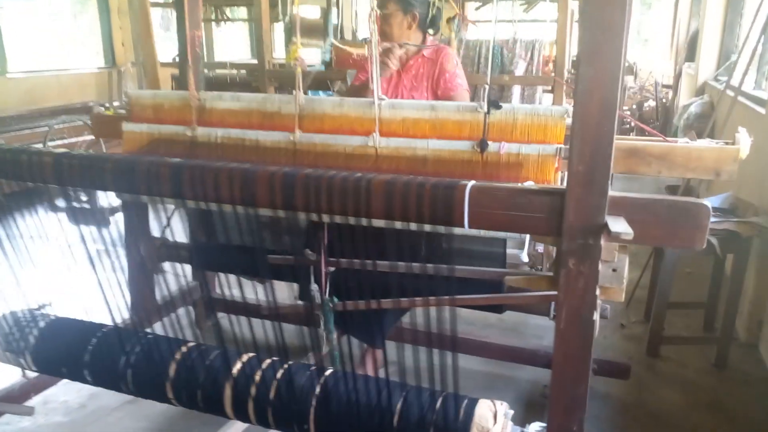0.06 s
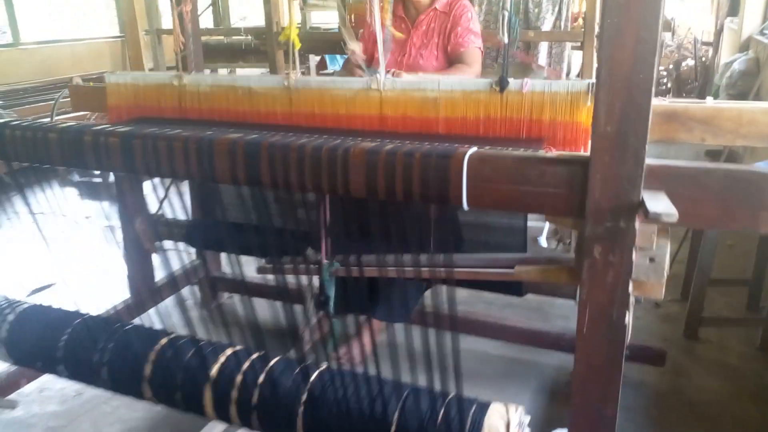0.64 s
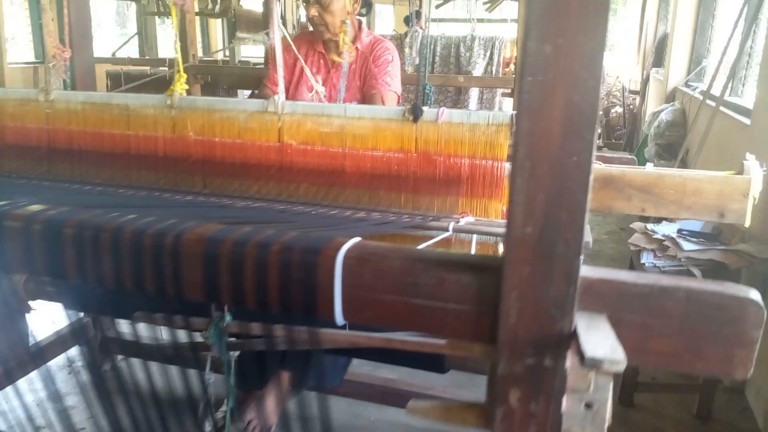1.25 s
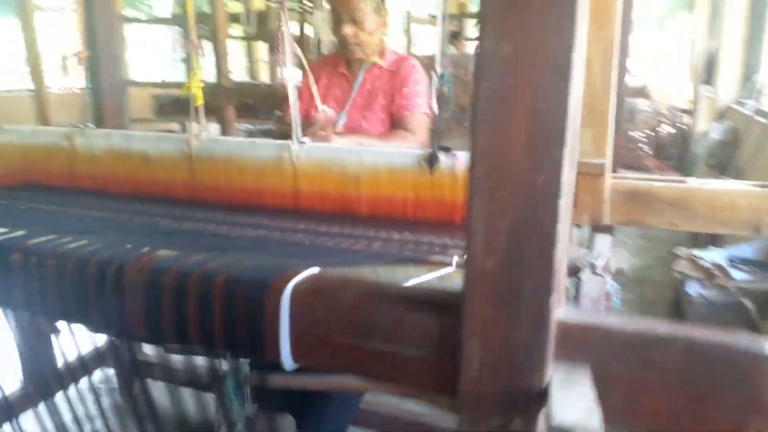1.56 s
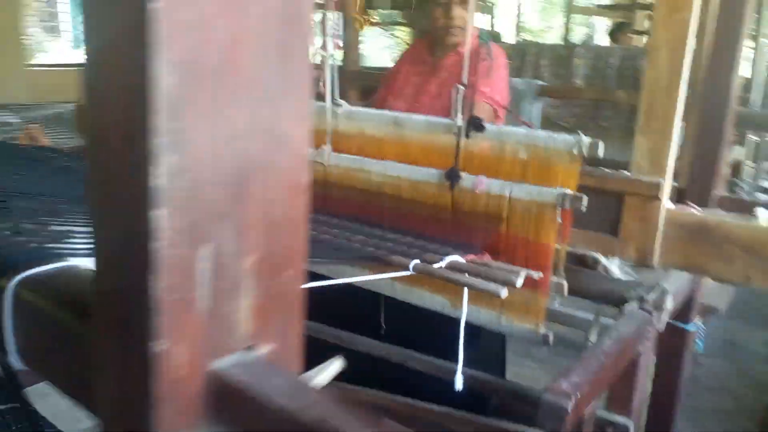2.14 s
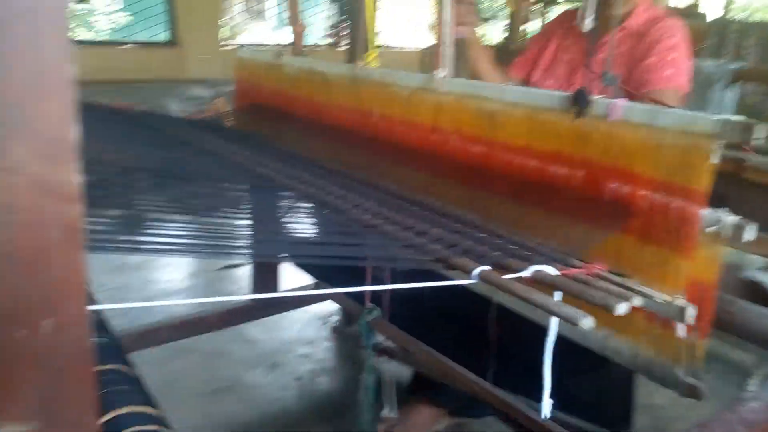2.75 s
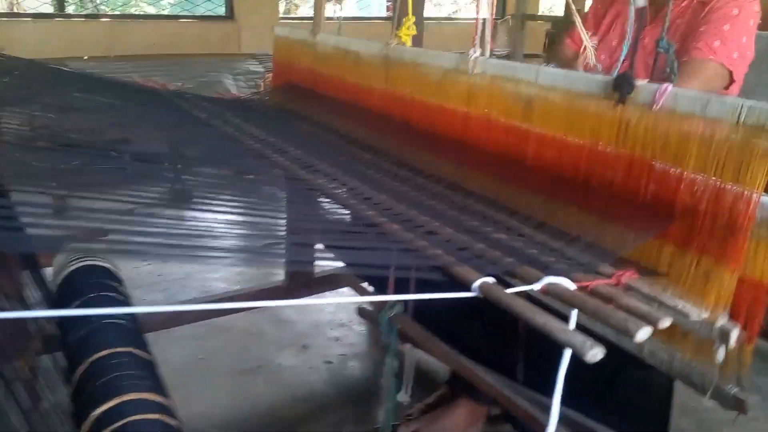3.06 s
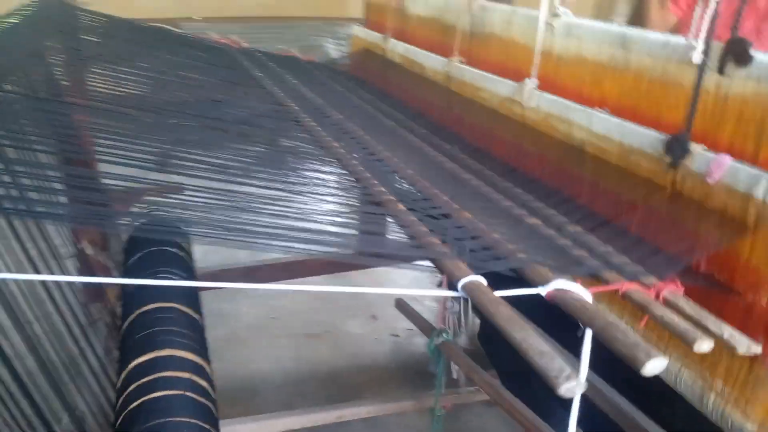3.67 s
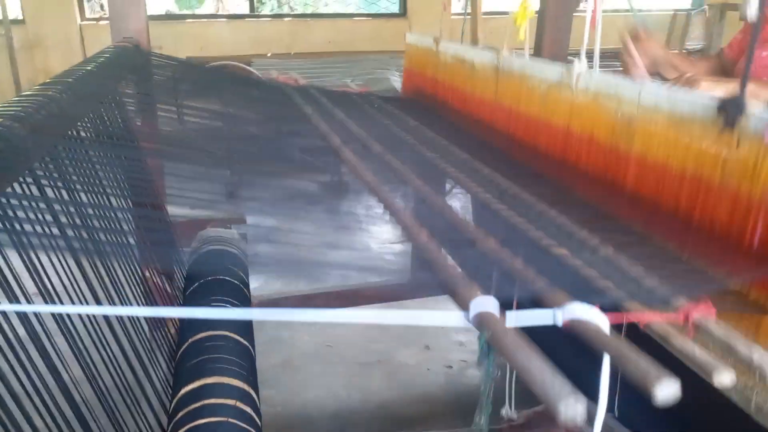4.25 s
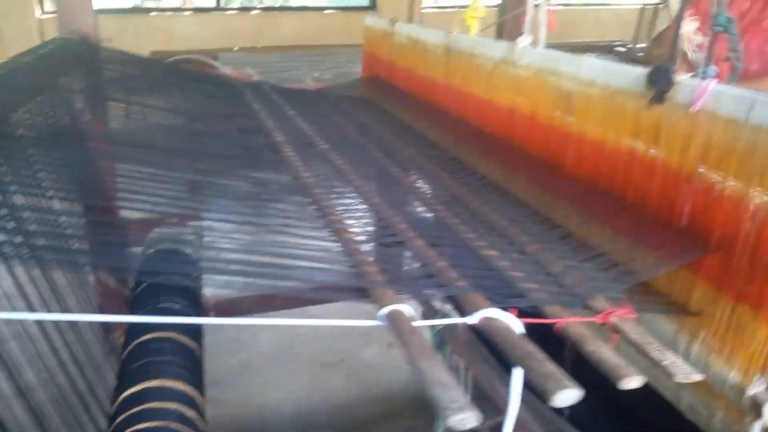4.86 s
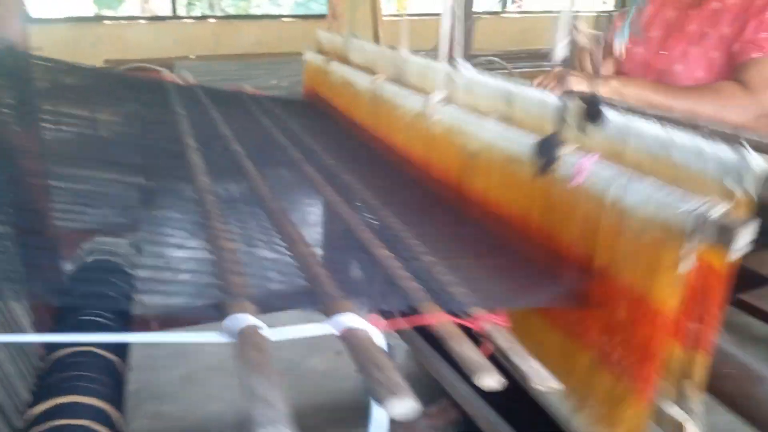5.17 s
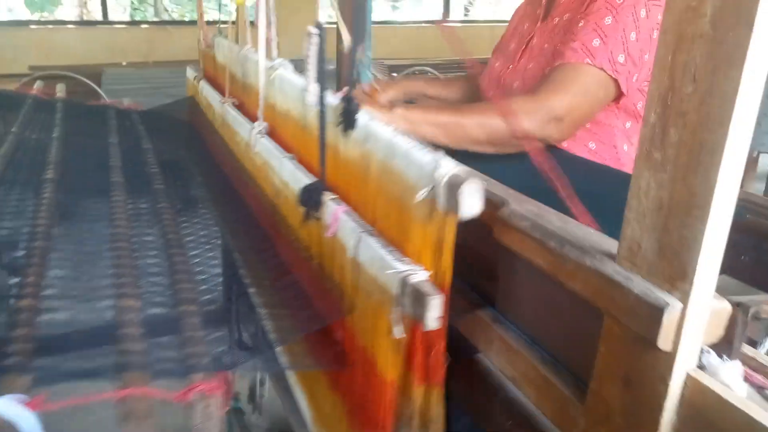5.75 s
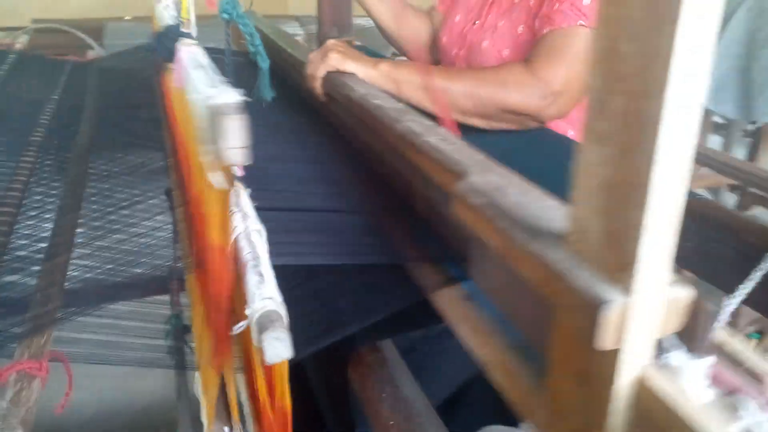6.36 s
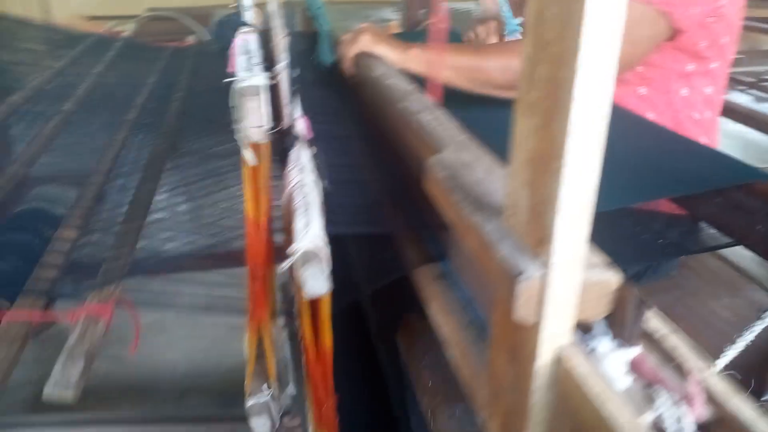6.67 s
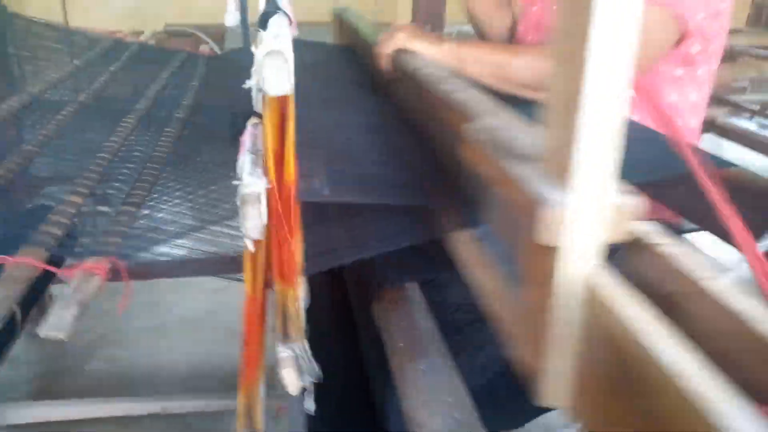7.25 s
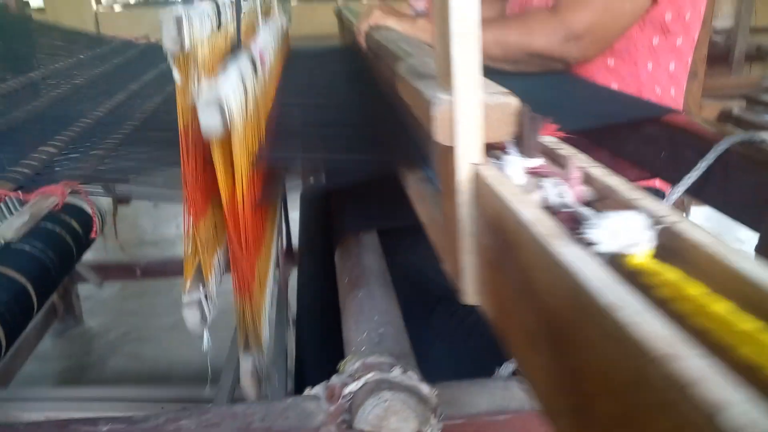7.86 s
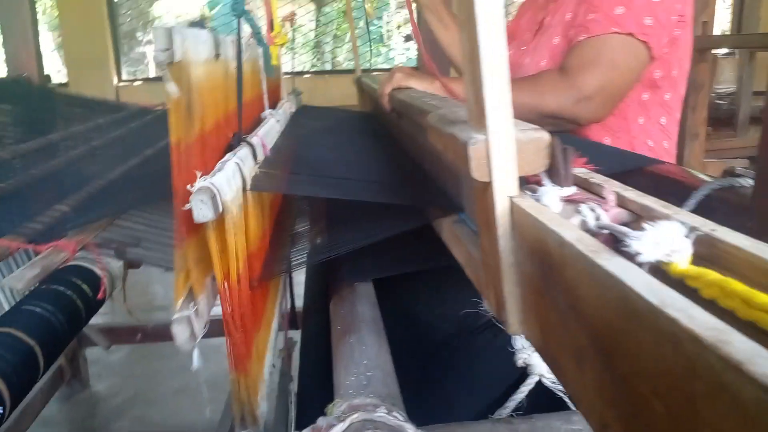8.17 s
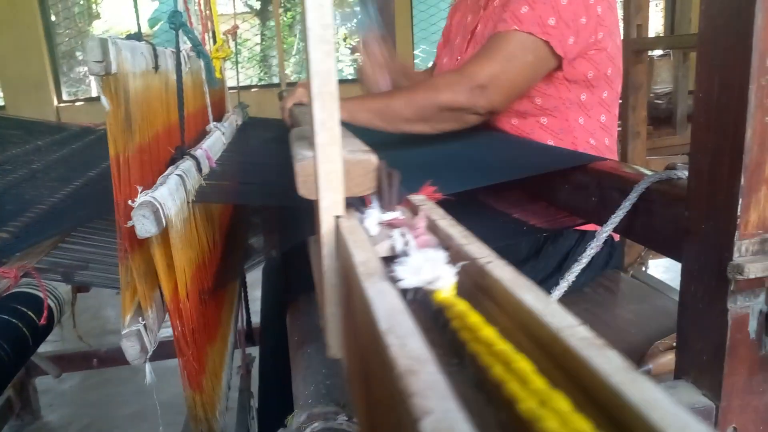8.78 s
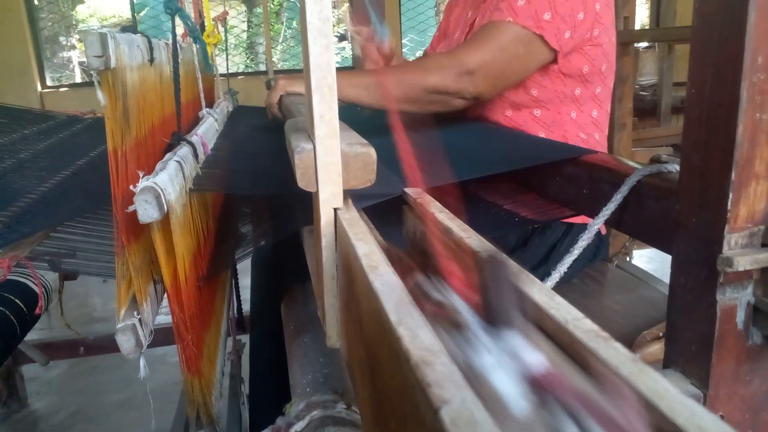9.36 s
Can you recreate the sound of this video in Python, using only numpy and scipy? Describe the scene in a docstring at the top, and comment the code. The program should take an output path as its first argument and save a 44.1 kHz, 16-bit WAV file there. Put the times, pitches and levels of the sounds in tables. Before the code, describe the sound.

A wooden handloom clacks in a quick, steady rhythm in a quiet workshop, growing closer, pausing briefly, then clacking once more.

```python
"""A wooden fly-shuttle handloom works in a quiet open workshop; each impact excites damped modes of wood.
First a treadle knocks and the warp threads rub as the shed opens. The picker strikes the shuttle, which
rattles along the race, lands in the opposite box and bounces; then the beater knocks as the warp swishes.
The cycle repeats from alternate ends, with a few thuds and squeaks, while the listener nears one box and
direct sound gains on reverberation. After a short pause comes a last throw as the listener draws back."""
import sys
import numpy as np
from scipy import signal
from scipy.fft import rfft, irfft, next_fast_len
from scipy.io import wavfile
from scipy.ndimage import uniform_filter1d

SR = 44100
rng = np.random.default_rng(int(sys.argv[2]) if len(sys.argv) > 2 else 0)


def generate_wav(sig):
    """Save sig (samples, or channels by samples) to the path in sys.argv[1] as 16-bit PCM at SR."""
    pcm = np.round(np.clip(np.atleast_2d(sig).T, -1, 1) * 32767).astype(np.int16)
    wavfile.write(sys.argv[1], SR, pcm)


N = 419832
TIME = np.arange(N) / SR
AGE = np.arange(24000) / SR   # seconds since the start of one impact
ROOM_T60_S, TREBLE_T60_S, EARLY_T60_S = 0.55, 0.51, 0.27
TREBLE_HZ = 2900   # modes below form the body tone, modes above the crack
NEAR_TOUCH_S, FAR_TOUCH_S = .013, .008   # contact time of the shuttle with picker or box
SPOT_WIDTH, SPOT_DB = .11, 0   # mode of the struck spot; bandwidth as a share of its pitch


def from_db(db):
    """Amplitude ratio of a level in decibels."""
    return np.exp(np.asarray(db) * np.log(10) / 20)


def unit_rms(x):
    """Normalises the power of a steady sound to rms 1."""
    return x / np.sqrt(np.mean(x ** 2) + 1e-20)


def unit_energy(x):
    """Normalises the energy of a transient to that of 10 ms at rms 1."""
    return x / np.sqrt(np.sum(x ** 2) / (.01 * SR) + 1e-20)


def add(track, start_s, sound):
    """Superposition: sums a sound into a track."""
    start = max(round(start_s * SR), 0)
    track[start:start + len(sound)] += sound[:max(N - start, 0)]


def resonate(x, hz, width_hz):
    """A damped resonator with unit gain at its peak."""
    r = np.exp(-np.pi * width_hz / SR)
    feedback = [1, -2 * r * np.cos(2 * np.pi * hz / SR), r * r]
    return signal.lfilter(np.array([1, 0, -1]) * (1 - r * r) / 2, feedback, x + 1e-18)


def pass_filter(x, hz, kind):
    """A second-order low- or high-pass."""
    return signal.lfilter(*signal.butter(2, hz, kind, fs=SR), x + 1e-18)


def coloured_noise(spectrum):
    """Spectral shaping: white noise takes on levels interpolated over log frequency; rms 1."""
    size = next_fast_len(N)
    hz = np.maximum(np.arange(size // 2 + 1) * SR / size, 1)
    points_hz, points_db = np.transpose(spectrum)
    level_db = np.interp(np.log(hz), np.log(points_hz), points_db)
    return unit_rms(irfft(rfft(rng.standard_normal(size)) * from_db(level_db), size)[:N])


def contacts(length_s, count, grit_db=-18, grit_s=0.0031):
    """Contact force of wood on wood: a few quick impulses, each trailing a little grit."""
    t = AGE[:SR // 20]
    force = np.zeros(len(t))
    jitter = rng.random(count) * (np.arange(count) > 0)
    touch_s = (np.arange(count) + jitter) / count * length_s
    force[(touch_s * SR).astype(int)] = rng.choice([-1, 1], count) * from_db(rng.normal(0, 2.9, count))
    grit = from_db(grit_db) * rng.standard_normal(len(t)) * np.exp(-t / grit_s)
    return np.pad(force + signal.fftconvolve(force, grit)[:len(t)], (0, len(AGE) - len(t)))


def wood(force, modes, crack_db, detune=0.02, scatter_db=2.5, early_db=-1, delay_s=.005):
    """Modal synthesis: modes, varied at each blow, sum to a direct sound and a diffuse echo."""
    drive = np.array([force, rng.standard_normal(len(AGE))])   # rows: direct sound, echo
    body, crack = 0, 0
    for k, (hz, width_hz, level_db) in enumerate(modes):
        ring = resonate(drive, hz * (1 + detune * rng.normal()), width_hz)
        ring *= from_db(level_db + scatter_db * rng.normal()) * (-1) ** k
        if hz < TREBLE_HZ:
            body += ring
        else:
            crack += ring
    body, crack = pass_filter(body, 3000, "low"), pass_filter(crack, 2000, "high")
    direct = unit_energy(body[0]) + from_db(crack_db) * unit_energy(crack[0])
    # early reflections from looms and floor die fast; the room's tail remains, shorter in the treble
    early = from_db(early_db - 60 * AGE / EARLY_T60_S)
    arrived = np.clip(AGE / delay_s - .5, 0, 1)
    body_echo = unit_energy(body[1] * arrived * np.hypot(early, from_db(-60 * AGE / ROOM_T60_S)))
    crack_echo = unit_energy(crack[1] * arrived * np.hypot(early, from_db(-60 * AGE / TREBLE_T60_S)))
    return direct, body_echo + from_db(crack_db) * crack_echo


# the listener's distance from the near shuttle box: time_s, distance_m
LISTENER_PATH = [(0, 1.15), (2.0, 1.15), (3.4, .7), (5.2, .52), (6.9, .28), (7.5, .29), (9.3, .5)]

def impact(force, modes, start_s, across, level_db, crack_db, detune):
    """Distance thins and blunts a blow and raises its share of echo; across is 0 near, 1 at the far box."""
    loom_width_m, critical_m = 1.6, 1.25   # at the critical distance, direct sound equals echo
    low_hz, loss_db_per_doubling, rise_s_per_m = 700, 0.8, .0015
    distance_m = np.hypot(np.interp(start_s, *np.transpose(LISTENER_PATH)), across * loom_width_m)
    low_loss_db = loss_db_per_doubling * np.log2(distance_m / .5)
    modes = [(hz, width_hz, db - (hz < low_hz) * low_loss_db) for hz, width_hz, db in modes]
    onset = np.minimum(.5 + .5 * AGE / (rise_s_per_m * distance_m), 1)
    direct, echo = wood(force * onset, modes, crack_db, detune)
    wet = distance_m / critical_m
    return from_db(level_db) * (direct + wet * echo) / np.hypot(1, wet)


# spectrum of the quiet workshop: frequency_hz, relative_density_db
WORKSHOP_SPECTRUM = [(30, -9), (90, 3.5), (450, -10.5), (1400, 1), (1900, -6), (3000, -25), (4000, -11),
                     (8000, -32), (16000, -22)]

def workshop(level_db=-73):
    """Stationary noise forms the background of the room."""
    return from_db(level_db) * coloured_noise(WORKSHOP_SPECTRUM)


# modes of the loom frame: pitch_hz, bandwidth_hz, level_db
FRAME_MODES = [(110, 140, -29), (318, 150, -10.5), (570, 84, -2), (775, 150, -2), (1030, 96, -3.5),
               (1592, 240, -3.5), (2230, 320, -7), (2900, 420, 3), (4500, 980, 0), (6000, 1700, -5),
               (11000, 8000, -18.5)]

def frame_knock(start_s, across, level_db, hz, crack_db, width_hz=190, part_db=1.5, touch_s=.003):
    """Impulse response: a struck part adds its own mode to those of the frame."""
    modes = list(FRAME_MODES) + [(hz, width_hz, part_db)]
    return impact(contacts(touch_s, count=2), modes, start_s, across, level_db, crack_db, detune=0.045)


# stray knocks of loose parts, and one light beater stroke at 8.164 s: start_s, level_db, pitch_hz
STRAY_KNOCKS = [(0.002, -26, 1450), (0.041, -24.5, 2770), (3.282, -19, 1030), (5.057, -19, 1030),
                (5.228, -21.5, 1030), (5.551, -18, 720), (5.679, -14.5, 2200), (6.208, -22.5, 1580),
                (6.301, -29, 1030), (6.828, -20, 960), (7.331, -30, 760), (7.677, -30, 1100),
                (8.164, -31, 960), (9.236, -25, 1060)]

def loose_parts(taut_before_s=.039, taut_db=-20, taut_hz=1130,
                slack_after_s=.074, slack_db=-23, slack_hz=2650, crack_db=-13, stray_across=.3):
    """Free play causes impacts: parts knock; the near picker taps on tightening and on dropping back."""
    taps = [(s - taut_before_s, 0, taut_db, taut_hz) for s, *_ in PICKER_STRIKES[::2]]
    taps += [(s + slack_after_s, 0, slack_db, slack_hz)
             for s, *_ in BEATER_STROKES if not last_landing(s)[0]]
    taps += [(s, stray_across, level_db, hz) for s, level_db, hz in STRAY_KNOCKS]
    out = np.zeros(N)
    for s, across, level_db, hz in taps:
        add(out, s, frame_knock(s, across, level_db, hz, crack_db))
    return out


def floor_rumble(loom, gain_db=-25, top_hz=110, t60_s=.8):
    """Energy storage: frame and floor take up the loom's vibration and release it as a low rumble."""
    retained = from_db(-120 / (t60_s * SR))
    shaking = np.sqrt(signal.lfilter([1], [1, -retained], loom ** 2 + 1e-18) / SR)
    low_noise = pass_filter(rng.standard_normal(N), top_hz, "low")
    return shaking * from_db(gain_db) * unit_rms(pass_filter(low_noise, top_hz / 2, "high"))


# a treadle opens the shed: start_s, level_db, pitch_hz
TREADLE_PRESSES = [(0.232, -24, 560), (1.118, -18, 830), (1.995, -22.5, 740), (2.898, -19, 1230),
                   (3.779, -19.5, 2500), (4.674, -20, 660), (5.536, -21.5, 800), (6.452, -21, 980),
                   (7.343, -14, 760)]

def treadles(near_across=.35, far_across=1.15, near_crack_db=-10, far_crack_db=-13):
    """Impact excitation: two treadles strike the frame in turn, the far one sounding duller."""
    out = np.zeros(N)
    for k, (s, level_db, hz) in enumerate(TREADLE_PRESSES):
        across, crack_db = (far_across, far_crack_db) if k % 2 else (near_across, near_crack_db)
        add(out, s, frame_knock(s, across, level_db, hz, crack_db))
    return out


def stroke(middle_s, length_s):
    """A half-sine envelope: sliding motion swells and stops."""
    out = np.zeros(N)
    add(out, middle_s - length_s / 2, np.sin(np.linspace(0, np.pi, round(length_s * SR))))
    return out


def reverberant_envelope(level):
    """Reverberation: half of the energy arrives at once, half decays exponentially in the room."""
    retained = from_db(-120 / (ROOM_T60_S * SR))
    lingering = signal.lfilter([1 - retained], [1, -retained], level ** 2 + 1e-18)
    return np.sqrt(.5 * level ** 2 + .5 * lingering)


# spectrum of dry threads rubbing: frequency_hz, relative_density_db
THREAD_SPECTRUM = [(40, -16), (110, -13), (200, -21.5), (330, -2.5), (450, -15), (600, -3), (1020, 0.5),
                   (1300, 1.5), (2300, -5.5), (3100, -14.5), (5800, -22), (8500, -30.5), (15000, -30)]
# the warp shifts between strokes: middle_s, length_s, relative_level_db
WARP_SHIFTS = [(6.76, .13, -33), (8.09, 0.15, -37.5), (8.68, 0.15, -47), (8.79, 0.18, -35)]

def warp(pull_before_s=0.04, pull_s=0.2, pull_db=-36.5, flight_after_s=.22, flight_s=.2, flight_db=-39,
         beat_s=.25, grain_db=2.8, grain_s=.004, tick_db=-20):
    """Stick-slip friction: threads rub as the shed opens, the shuttle passes and the beater swings."""
    rubs = list(WARP_SHIFTS) + [(s, beat_s, swish_db) for s, _, _, swish_db in BEATER_STROKES]
    rubs += [(s - pull_before_s, pull_s, pull_db) for s, *_ in PICKER_STRIKES[1::2]]
    rubs += [(s - pull_before_s / 2, pull_s / 2, pull_db) for s, *_ in PICKER_STRIKES[::2]]
    rubs += [(s + flight_after_s, flight_s, flight_db) for s, *_ in PICKER_STRIKES]
    speed = sum(from_db(level_db) * stroke(s, length_s) for s, length_s, level_db in rubs)
    grains = unit_rms(uniform_filter1d(rng.standard_normal(N), round(grain_s * SR)))
    friction = unit_rms(coloured_noise(THREAD_SPECTRUM) * from_db(grain_db * grains))
    return reverberant_envelope(speed) * friction + from_db(tick_db) * heddle_ticks(speed)


def heddle_ticks(speed, per_s=70, spread_db=5, width_hz=1300, low_hz=5500, high_hz=14000, count=8):
    """Shot noise: single threads snap past the heddles at random, each with a small bright ring."""
    out, tries = 0, 400
    chance = per_s * N / SR / count / tries
    for hz in np.geomspace(low_hz, high_hz, count):
        ticks = np.zeros(N)
        at = rng.integers(0, N, tries)
        ticks[at] = (rng.random(tries) < chance) * from_db(spread_db * rng.standard_normal(tries))
        out += resonate(ticks, hz, width_hz)
    return speed * unit_rms(out)


# modes of picker and shuttle: pitch_hz, bandwidth_hz, level_db
PICKER_MODES = [(80, 44, -26), (320, 85, -14.5), (614, 130, -8.5), (960, 118, 0), (1098, 116, -0.5),
                (1579, 220, -2), (1865, 200, -4.5), (2350, 238, -2.5), (3530, 700, -1.5), (4660, 1100, 1),
                (6080, 1300, -2), (12000, 8000, -12)]
# throws, near and far in turn: start_s, level_db, spot_pitch_hz, relative_rattle_db
PICKER_STRIKES = [(0.318, -8.5, 1550, -25), (1.202, -7.5, 1600, -24), (2.084, -8.5, 1700, -25.5),
                  (2.981, -8, 1550, -24), (3.862, -8.5, 950, -23), (4.752, -8, 2250, -24),
                  (5.635, -7, 1700, -23), (6.534, -6.5, 990, -28.5), (7.431, -9, 600, -32),
                  (8.897, -8.5, 1400, -27.5)]

def throws(near_crack_db=-12.5, far_crack_db=-13, race_after_s=.034, race_db=-2.5):
    """Momentum transfer: the picker strikes the shuttle along the race, crisper from the near end."""
    out = np.zeros(N)
    cord_snap = (3150, 700, -2)   # pitch_hz, bandwidth_hz, level_db
    for k, (s, level_db, hz, rattle_db) in enumerate(PICKER_STRIKES):
        far = k % 2
        touch_s, crack_db = (FAR_TOUCH_S, far_crack_db) if far else (NEAR_TOUCH_S, near_crack_db)
        modes = list(PICKER_MODES) + [(hz, SPOT_WIDTH * hz, SPOT_DB), cord_snap]
        add(out, s, impact(contacts(touch_s, count=5), modes, s, far, level_db, crack_db, detune=0.015))
        if far:
            rattle = race(crack_db=-7, room_db=-4, weft_db=-14)
        else:
            rattle = race(crack_db=-5.5, room_db=-6, weft_db=-13)
        add(out, s + race_after_s, from_db(rattle_db + race_db) * rattle)
    return out


def race(crack_db, room_db, weft_db, run_s=0.08, ticks_per_s=220, spread_db=4.5, scrape_db=-28, weft_s=.24):
    """Roughness excitation: the shuttle skips over the reed wires; the weft ticks off the bobbin."""
    size = len(AGE)
    ticks = (rng.random(size) < ticks_per_s / SR) * rng.choice([-1, 1], size)
    ticks = ticks * from_db(spread_db * rng.standard_normal(size))
    scrape = from_db(scrape_db) * rng.standard_normal(size)
    direct, echo = wood((ticks + scrape) * (AGE < run_s), PICKER_MODES, crack_db)
    # the echo builds up for as long as the shuttle runs
    swell = np.minimum(AGE / run_s, 1) * from_db(60 * np.minimum(AGE, run_s) / ROOM_T60_S)
    weft_ticks = pass_filter(ticks * (AGE < weft_s), TREBLE_HZ, "high")
    weft = from_db(crack_db + weft_db) * unit_energy(weft_ticks)
    return (direct + weft + from_db(room_db) * unit_energy(echo * swell)) * np.sqrt(run_s / .01)


# modes of a shuttle box: pitch_hz, bandwidth_hz, level_db
BOX_MODES = [(90, 93, -33), (310, 100, -17), (591, 66, -3), (770, 130, -3.5), (1030, 182, 2),
             (1530, 200, -1.5), (1745, 150, -1), (2560, 640, -8.5), (3670, 1000, -2.5), (4750, 930, 0.5),
             (6400, 1300, -3), (12500, 5900, -12.5)]

def box_hit(start_s, level_db, force, detune):
    """Free vibration: the box rings where the shuttle hits it; the near box also clinks."""
    far, hz, crack_db = last_landing(start_s)
    clink = (3590, 400, -3)   # pitch_hz, bandwidth_hz, level_db
    modes = list(BOX_MODES) + [(hz, SPOT_WIDTH * hz, SPOT_DB)] + ([] if far else [clink])
    return impact(force, modes, start_s, far, level_db, crack_db, detune)


# the shuttle lands, far and near in turn: start_s, level_db, spot_pitch_hz, relative_crack_db
SHUTTLE_LANDINGS = [(0.636, -7, 1550, -9.5), (1.523, -10.5, 1500, -8.5), (2.396, -7, 1550, -7.5),
                    (3.295, -6.5, 800, -10.5), (4.171, -9, 1620, -8.5), (5.069, -9.5, 590, -10),
                    (5.949, -12, 1700, -8.5), (6.85, -6.5, 950, -12), (7.746, -13.5, 780, -11),
                    (9.277, -10, 1480, -13)]
# its hardest bounces in the box: start_s, level_db
SHUTTLE_BOUNCES = [(0.694, -13), (1.588, -15), (3.334, -12.5), (3.357, -13.5), (4.231, -14), (5.081, -11.5),
                   (5.108, -11), (5.15, -15), (6.0, -16), (6.889, -13.5), (6.911, -9.5), (6.921, -14),
                   (6.938, -11), (6.963, -18.5), (7.005, -16), (7.799, -18), (9.291, -10.5), (9.337, -13.5)]

def landings(bounce_s=.004, gap_s=.03, jitter=.15, chatter_db=-11, loss_db=1.2, chatter_count=5):
    """Inelastic collision: the shuttle lands and rebounds; in the near box it chatters ever more softly."""
    out, bounces = np.zeros(N), list(SHUTTLE_BOUNCES)
    for s, level_db, *_ in SHUTTLE_LANDINGS:
        far = last_landing(s)[0]
        force = contacts(FAR_TOUCH_S if far else NEAR_TOUCH_S, count=5)
        add(out, s, box_hit(s, level_db, force, detune=0.018))
        if not far:
            bounces += [(s + gap_s * (n + 1 + jitter * rng.normal()), level_db + chatter_db - loss_db * n)
                        for n in range(chatter_count)]
    for s, level_db in bounces:
        add(out, s, box_hit(s, level_db, contacts(bounce_s, count=2), detune=0.04))
    return out


def last_landing(time_s):
    """Whether the latest landing was in the far box, with its pitch and crack level."""
    k = max(sum(s <= time_s for s, *_ in SHUTTLE_LANDINGS) - 1, 0)
    _, _, hz, crack_db = SHUTTLE_LANDINGS[k]
    return k % 2 == 0, hz, crack_db


# the beater swings after a landing: start_s, level_db, pitch_hz, relative_swish_db
BEATER_STROKES = [(0.879, -14.5, 1645, -30), (1.751, -21, 755, -31), (2.657, -20, 1520, -28),
                  (3.529, -14.5, 800, -33), (4.425, -22, 1520, -29), (5.298, -16, 730, -33),
                  (6.18, -24, 980, -29.5), (7.107, -14, 1640, -39), (9.438, -15.5, 750, -42)]

def beater(crack_db=-15, far_across=.7):
    """Impact excitation: the beater rings the frame toward the end where the shuttle lies."""
    out = np.zeros(N)
    for s, level_db, hz, _ in BEATER_STROKES:
        add(out, s, frame_knock(s, far_across * last_landing(s)[0], level_db, hz, crack_db))
    return out


# low thuds that come with the loudest blows at the near box: start_s, peak_db
NEAR_BLOW_THUDS = [(1.801, -41), (5.630, -33), (6.855, -31), (7.433, -32)]

def beam_thuds(start_hz=210, end_hz=42, sink_s=.015, swell_s=0.013):
    """Dispersion: higher bending waves in the long beams arrive first, so each thud sinks in pitch."""
    out, t = np.zeros(N), np.arange(SR // 5) / SR
    pitch_hz = end_hz + (start_hz - end_hz) * np.exp(-t / sink_s)
    envelope = t / swell_s * np.exp(1 - t / swell_s)
    thud = envelope * np.sin(2 * np.pi * np.cumsum(pitch_hz) / SR)
    for s, peak_db in NEAR_BLOW_THUDS:
        add(out, s, from_db(peak_db) * thud)
    return out


# cords and bobbin squeak: middle_s, length_s, pitch_hz, level_db
FRICTION_SQUEAKS = [(2.337, 0.16, 5800, -52), (4.434, .03, 5900, -40), (5.163, .035, 3450, -22),
                    (6.736, .07, 6000, -47), (9.16, 0.15, 5800, -53)]

def squeaks(width_hz=900):
    """Dry friction excites one unsteady resonance in each squeak."""
    out, noise = np.zeros(N), rng.standard_normal(N)
    for s, length_s, hz, level_db in FRICTION_SQUEAKS:
        ring = resonate(resonate(noise, hz, width_hz), hz, width_hz)
        out += from_db(level_db) * stroke(s, length_s) * unit_rms(ring)
    return out


# timbre of the loom along the walk: time_s, hollow_gain_db, bite_gain_db
WALK_TIMBRE = [(0.3, -2.5, 0), (2.2, -2, 0), (3.3, -3, 4.5), (5.2, -3, 4), (6.1, 2, 0), (6.9, 2, -6),
               (7.5, 3, -5), (8.2, 0, 2)]

def along_the_walk(x, hollow_hz=1020, hollow_width_hz=170, bite_hz=3000, bite_width_hz=1500):
    """A sound field varies with position: a hollow and a biting band come and go along the walk."""
    times_s, *gains_db = np.transpose(WALK_TIMBRE)
    hollow, bite = (from_db(np.interp(TIME, times_s, db)) - 1 for db in gains_db)
    return (x + hollow * resonate(x, hollow_hz, hollow_width_hz)
            + bite * resonate(x, bite_hz, bite_width_hz))


def scene(warp_db=-1):
    """Superposition of the loom, the rumble it drives and the quiet workshop, in one channel."""
    impacts = treadles() + throws() + landings() + beater() + loose_parts()
    loom = along_the_walk(impacts + from_db(warp_db) * warp()) + beam_thuds() + squeaks()
    return (loom + floor_rumble(loom) + workshop())[None]


def record(dry, ceiling=1.3, cutoff_hz=15900):
    """Soft saturation rounds the loudest peaks; a steep low-pass limits the bandwidth."""
    rounded = dry / (1 + (dry / ceiling) ** 4) ** (1 / 4)
    return signal.sosfilt(signal.ellip(10, .2, 70, cutoff_hz, fs=SR, output="sos"), rounded)


dry = scene()
out = record(dry)
generate_wav(out)
```